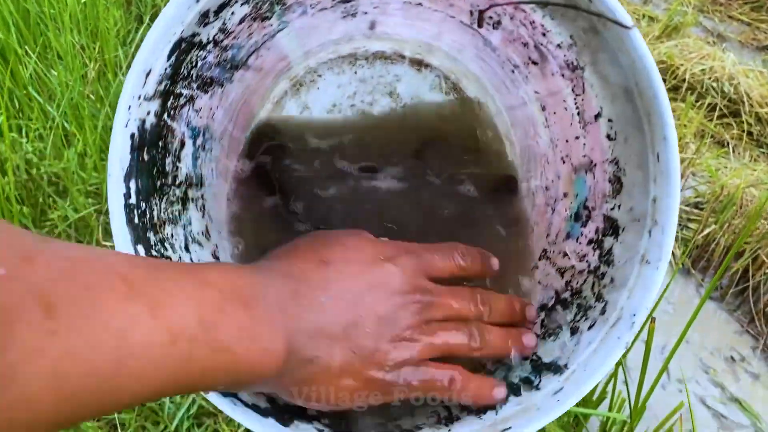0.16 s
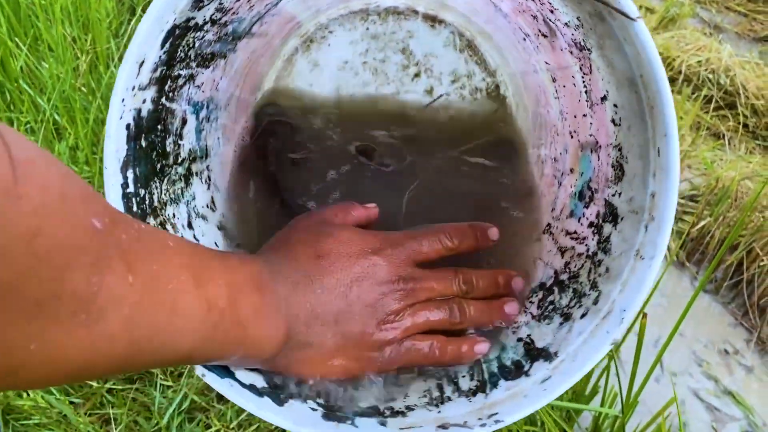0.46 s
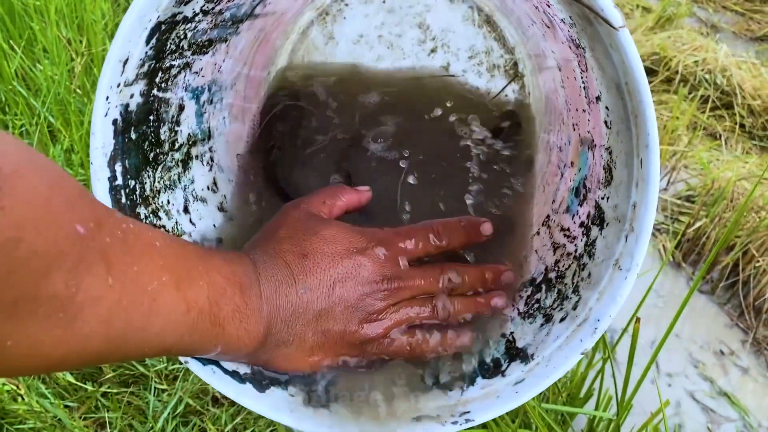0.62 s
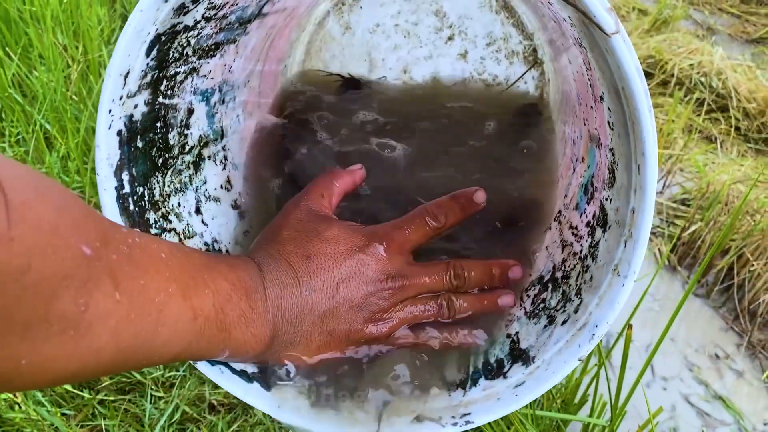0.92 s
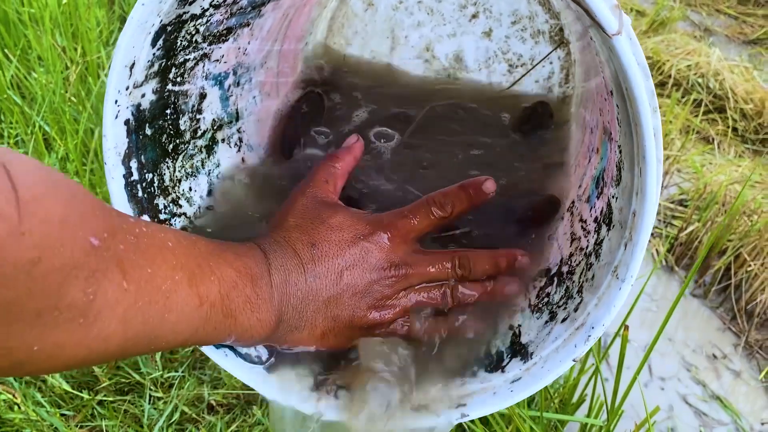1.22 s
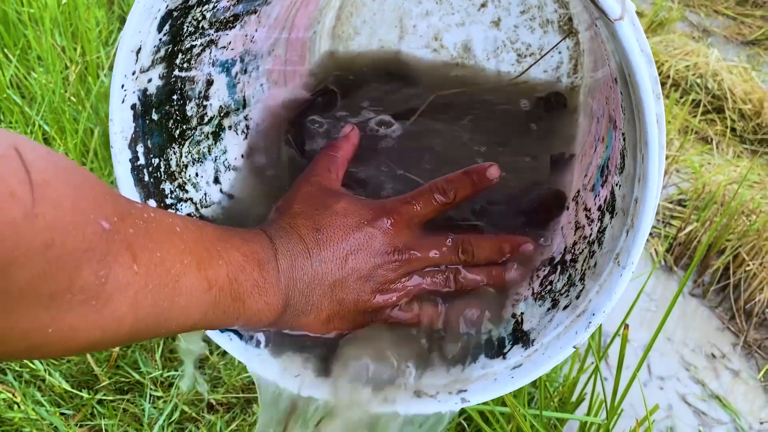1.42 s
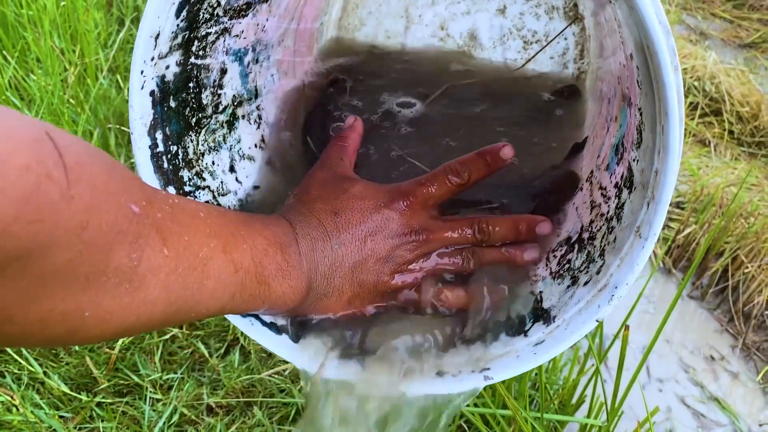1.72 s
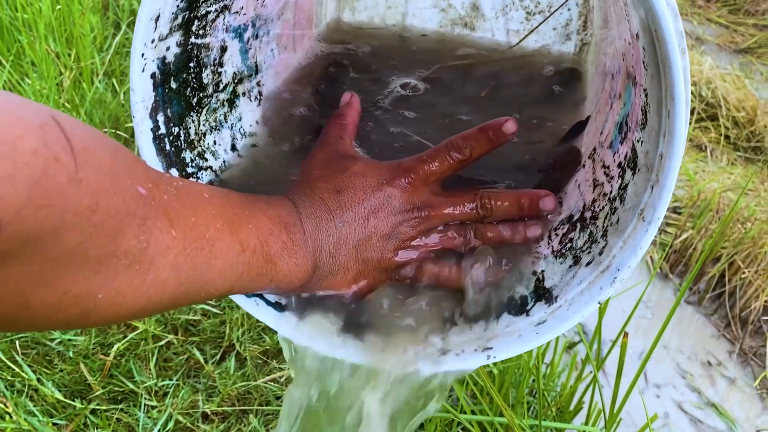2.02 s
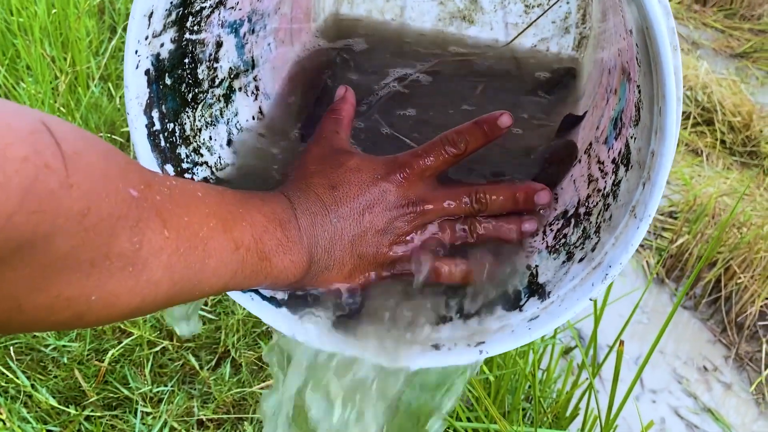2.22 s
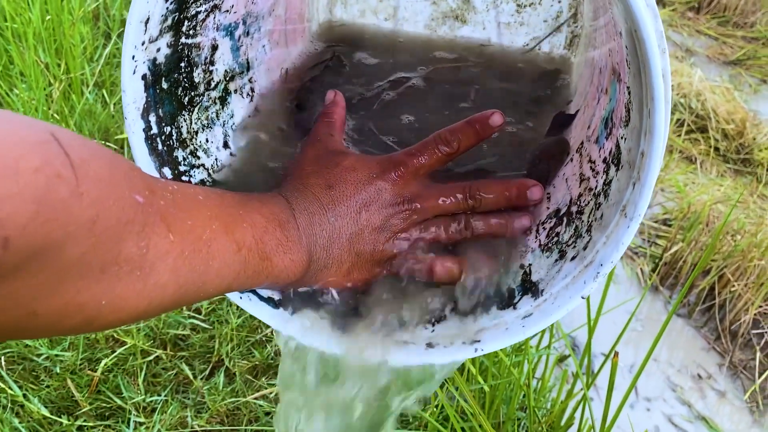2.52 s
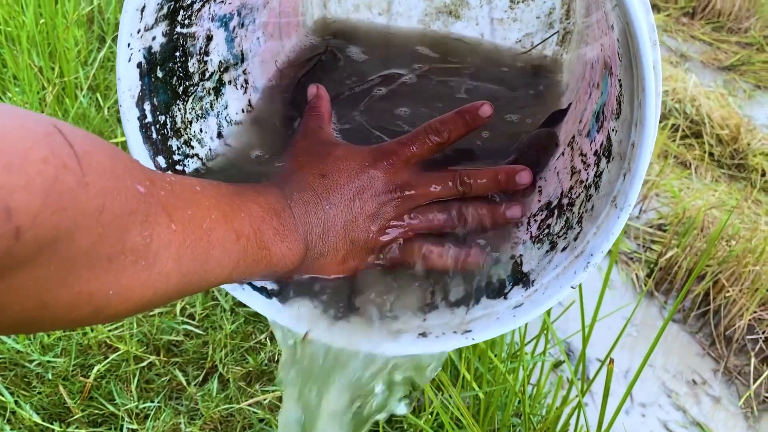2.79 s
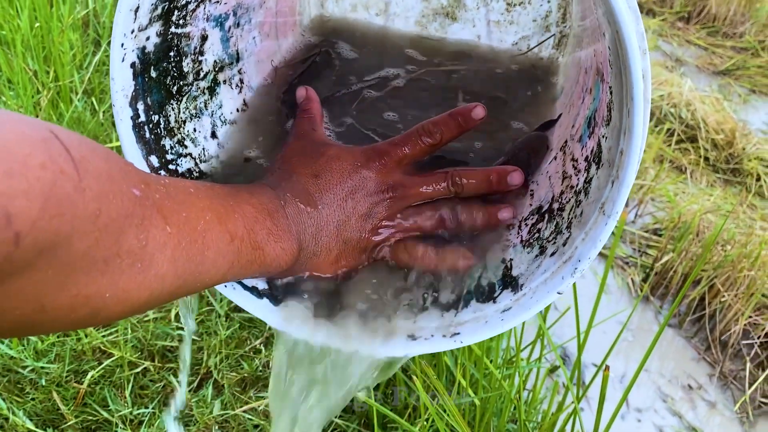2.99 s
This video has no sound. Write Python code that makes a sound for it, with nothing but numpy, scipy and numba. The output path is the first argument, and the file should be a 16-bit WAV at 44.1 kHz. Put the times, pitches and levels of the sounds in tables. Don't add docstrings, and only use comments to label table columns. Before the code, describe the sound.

Water splashes and patters onto wet grass while shells knock dully inside a tilted plastic bucket

```python
import sys
import numpy as np
from scipy import signal
from scipy.fft import rfft, irfft
from scipy.io import wavfile
from scipy.ndimage import uniform_filter1d
from numba import njit

SR = 44100
rng = np.random.default_rng(int(sys.argv[2]) if len(sys.argv) > 2 else 0)


def to_wav(sig):
    pcm = np.clip(np.atleast_2d(sig), -1, 1) * 32767
    pcm = np.round(pcm).astype(np.int16)
    wavfile.write(sys.argv[1], SR, pcm.T)


def boost_factor(decibels):
    exponent = np.asarray(decibels, float) / 20
    return 10 ** exponent


N = 138915

TOP_HZ, CUT_HZ = 15900, 16400

# (time [s], stream level [dB], gurgle level [dB])
FLOW = [(0, -36.5, -47.5), (.32, -34, -48.5), (.4, -35.5, -51), (.47, -50, -53.5), (.55, -48, -47),
        (.6, -52.5, -58.5), (.71, -59.5, -56), (.795, -61, -62), (.86, -55, -42), (.93, -60.5, -53.5),
        (.955, -40, -54.5), (.99, -51, -55), (1.05, -39, -53.5), (1.18, -43.5, -49), (1.54, -36.5, -52.5),
        (1.95, -35, -52.5), (2.38, -36.5, -47.5), (3.15, -37.5, -47.5)]
# (frequency [Hz], density [dB per Hz])
STREAM_SPECTRUM = [(900, -43), (1500, -7.5), (2300, -6), (3200, -2), (4950, -1.5), (6100, -8), (10700, -5),
                   (16000, -13.5)]
PATTER_EDGES_HZ = (0, 2700, 6000, 10000, TOP_HZ)
DROPS_PER_S, DROP_CYCLES, DROP_SCATTER_DB = 4000, 4.5, 5
HISS_DB, PATTER_DB, STREAM_DB = -1, 1.1, -0.5

BUBBLES_PER_S, BUBBLE_LOW_HZ, BUBBLE_OCTAVES = 1100, 580, 1.05
BUBBLE_CYCLES, BUBBLE_GLIDE, BUBBLE_DB = 14.7, 0.31, 2.5

# (time [s], level [dB])
WIND = [(0, -39.5), (.24, -37.5), (.3, -42.5), (.69, -37.5), (.76, -36), (.82, -39.5), (.88, -31),
        (.94, -45), (1.1, -46), (1.17, -37), (1.3, -43.5), (2.3, -43.5), (2.56, -42), (2.68, -38.5),
        (3.15, -44.5)]
WIND_HZ, WIND_WIDTH_HZ = 62, 35.2
BUFFET_HZ, BUFFET_DB, BUFFET_FLICKER_DB = 115, -4.5, 4.5
SLOSH_DB, SLOSH_FLICKER_DB = -58.5, 2

# (time [s], peak level [dB], ring frequency [Hz], drum-note level [dB])
KNOCKS = [(0.051, -24.5, 573, -24), (0.11, -20.5, 704, -36), (0.207, -17.5, 550, -28.5),
          (0.36, -24.5, 590, -31.5), (0.432, -18, 980, -33), (0.484, -23.5, 613, -36),
          (0.528, -22.5, 610, -35.5), (0.574, -24, 626, -30), (0.607, -33.5, 704, -31),
          (0.645, -35.5, 990, -28), (0.671, -27.5, 500, -50), (0.811, -35, 910, -56),
          (0.824, -27, 900, -43), (0.974, -26, 542, -29), (1.049, -29, 590, -29), (1.093, -23, 650, -34),
          (1.145, -17.5, 605, -21), (1.187, -24, 616, -17.5), (1.285, -16, 648, -21.5),
          (1.323, -24.5, 577, -22), (1.378, -39, 495, -42), (1.431, -35, 520, -36),
          (1.464, -29.5, 690, -29.5), (1.582, -23.5, 494, -31), (1.621, -30, 886, -33),
          (2.66, -24.5, 900, -47), (2.695, -27, 1170, -45.5)]
# (frequency [Hz], level [dB], decay by 60 dB [s])
WALL_MODES = [(400, -11.5, 0.13), (614, -9, 0.21), (801, 3.5, 0.042), (968, 2.5, 0.041), (1353, -1, 0.051),
              (1550, 0.5, 0.029), (2195, -7.5, 0.024)]
DRUM_HZ, DRUM_T60_S, DRUM_RISE_S, DRUM_DB, DRUM_LATE_S = 240, 0.091, 0.0032, 5.5, 0.005
RING_T60_S, RING_DB, WALL_DB, CRACK_DB = 0.024, 3.5, -10.5, -15
REBOUND_S, REBOUND_DB = 0.007, -8

# (time [s], length [s], start frequency [Hz], end frequency [Hz], level [dB])
GLUGS = [(0.073, 0.061, 388.3, 285.5, -18.5), (0.103, 0.074, 280, 168, -23), (0.641, 0.017, 171, 270, -22),
         (.645, 0.025, 366, 378, -27), (0.668, 0.012, 407, 533, -23.5), (0.816, 0.025, 400, 427, -31),
         (0.844, 0.043, 115, 91.4, -30), (1.176, 0.034, 281, 248, -16.5), (1.587, 0.012, 236, 197, -22.5),
         (2.537, 0.024, 224, 198, -32), (2.544, 0.031, 80, 62, -25.5), (2.894, 0.11, 197, 267, -36.5),
         (3.126, 0.072, 198, 188, -28.5), (0.27, .026, 720, 900, -30), (.288, 0.02, 900, 1150, -32),
         (1.733, 0.039, 221, 220, -36), (2.14, 0.023, 226, 222, -36), (2.322, 0.015, 1110, 1160, -37.5),
         (0.991, 0.024, 258, 240, -30.5), (1.69, 0.032, 200, 190, -40), (2.008, 0.035, 216, 205, -38),
         (2.218, 0.033, 219, 199, -38), (2.707, 0.028, 198, 149, -35), (2.59, 0.035, 75, 60, -35.5)]
OVERTONE_DB = -17

# (time [s], peak level [dB],
# frequency [Hz])
PLOPS = [(.7287, -33, 1000), (.812, -33, 790), (.818, -32, 1160), (.831, -20, 820), (.88, -36, 910),
         (.095, -27, 650), (1.89, -33, 786), (2.262, -30, 820), (2.349, -34, 930), (2.397, -38, 770),
         (2.446, -33, 837), (2.489, -28, 540), (2.773, -28, 640), (2.571, -33.5, 794), (2.65, -31, 620),
         (2.832, -31, 696), (2.87, -34, 520), (2.9, -31.5, 600), (2.958, -28.5, 1330), (3.041, -35.5, 750),
         (3.08, -33.5, 820)]
PLOP_CYCLES, PLOP_GLIDE, PLOP_DB = 21, 0.27, 3

# (time [s], peak level [dB],
# centre frequency [Hz], spray level [dB], spread [ms])
SPLATS = [(0.0997, -12, 2960, -34, 3), (.125, -12.5, 1900, -30, 2.5), (0.154, -13.5, 4700, -28, 1.5),
          (0.2287, -11, 4250, -25, 1.02), (.2683, -14.5, 4740, -14, 3), (0.372, -15.5, 2270, -14, 4.4),
          (0.4311, -4.5, 4220, -13, 1), (.446, -22, 2100, -22, 4), (1.09, -24, 1400, -40, 8),
          (1.286, -21, 2600, -20, 0.91), (1.3784, -27, 3180, -15, 2), (1.5278, -19, 2840, -3.5, 1.54),
          (1.593, -15, 4700, -12, 2.8), (2.0505, -13, 2870, -19, 2.7), (2.0766, -14, 3400, -16, 3),
          (2.144, -16, 3800, -15.5, 2.2), (2.1665, -8, 3600, -32, 0.4), (2.1954, -14.5, 3660, -8.5, 3.4),
          (2.229, -12, 4370, -20, 4.1), (2.2613, -15, 3000, -16, 3.7), (2.3126, -11, 2520, -35, 0.45),
          (2.343, -15, 4000, -15, 2.4), (2.348, -12, 3100, -17, 1.2), (2.372, -16, 4200, -12, 2.2),
          (2.394, -10, 4000, -10.5, 2), (2.447, -13, 3000, -13, 3.9), (2.5681, -13.5, 3290, -11, 3.5),
          (2.6287, -15, 3300, -23, 1.3), (2.6954, -21, 1880, -32, 3), (3.022, -15, 4900, -5, 1.2),
          (3.0798, -18.5, 3140, -10, 2),
          (0.4626, -23, 4570, -8, 2), (0.4976, -23, 11400, -25, 3), (0.521, -19, 6700, -22, 2),
         (0.5312, -21.5, 6700, -4.5, 2), (0.5433, -22.5, 4500, -4, 3), (0.5744, -29, 4670, -25, 2),
         (0.594, -23, 3350, -27, 2), (.663, -34.5, 4630, -8, 2), (0.7205, -21.5, 11200, -15.5, 2),
         (0.729, -20, 7050, -25, 1.5), (0.7397, -29, 6100, -13, 1.5), (.7405, -23, 2500, -25, 1.5),
         (.822, -32, 4530, -25, 8), (0.851, -31, 3550, -9, 12), (0.907, -31, 3500, -5, 2),
         (0.9477, -26, 4930, -14, 1.5), (.998, -31, 4200, -4, 3), (1.026, -32.5, 4000, -4, 4),
         (1.04, -25, 7840, -14, 3)]
SPLAT_OCTAVES, SPLAT_T60_S, SPRAY_TAIL_S = 0.27, 0.012, 0.0018
SPLAT_DB, SPRAY_DB = -4.5, 1.5


def unit(x):
    return x / np.sqrt(np.mean(x ** 2))


def curve(table, order):
    rows = np.array(table)
    return np.interp(np.arange(N) / SR, rows[:, 0], rows[:, order])


def band(x, hz, width_hz):
    return signal.lfilter(*signal.iirpeak(hz, hz / width_hz, fs=SR), x)


def walk(rate):
    hold = int(SR / rate)
    steps = np.repeat(rng.standard_normal(N // hold + 1), hold)
    smooth = uniform_filter1d(uniform_filter1d(steps, hold), hold)
    return unit(smooth[:N])


@njit
def ring(start, step, t60, rise, size, glide, count):
    out = np.zeros(count)
    for k in range(len(start)):
        fade, soft = np.exp(-np.log(1000.) / t60[k]), np.exp(-1 / rise[k])
        env, up, phase = size[k], 1., 0.
        for i in range(max(int(start[k]), 0), min(int(start[k] + t60[k]), count)):
            phase += step[k] * (1 + glide[k] * (i - start[k]) / t60[k])
            env, up = env * fade, up * soft
            out[i] += env * (1 - up) * np.sin(phase)
    return out


def grains(s, hz, t60_s, db, rise_s, glide):
    values = np.broadcast_arrays(s, hz, t60_s, db, rise_s, glide)
    s, hz, t60_s, db, rise_s, glide = (np.ascontiguousarray(v, float) for v in values)
    step = 2 * np.pi * np.minimum(hz, SR / 3) / SR
    return ring(s * SR, step, t60_s * SR, rise_s * SR, boost_factor(db), glide, N)


def bursts(s, db, t60_s, rise_s):
    clicks = np.zeros(N)
    clicks[(s * SR).astype(int)] = boost_factor(db)
    t = np.arange(SR // 10) / SR
    response = boost_factor(-60 * t / t60_s) * (1 - np.exp(-t / rise_s))
    return signal.fftconvolve(clicks, response)[:N]


def stream():
    when, pitch, chance = rng.random((int(DROPS_PER_S * N / SR), 3)).T
    hz = 1100 * 14 ** pitch
    db = np.minimum(-DROP_SCATTER_DB * np.log(chance), 16)
    drops = grains(when * N / SR, hz, DROP_CYCLES * 2 / hz, db, 0.0001, 0.28)
    spectrum, f = rfft(drops), np.fft.rfftfreq(N, 1 / SR) + 1
    flat = spectrum / np.sqrt(uniform_filter1d(np.abs(spectrum) ** 2, size=2000))
    hiss = rfft(rng.standard_normal(N)) / np.sqrt(N)
    shape_hz, shape_db = np.array(STREAM_SPECTRUM).T
    colour = boost_factor(np.interp(np.log(f), np.log(shape_hz), shape_db, left=-60))
    water = (flat + boost_factor(HISS_DB) * hiss) * colour
    patter = np.zeros(N)
    for low, high in zip(PATTER_EDGES_HZ, PATTER_EDGES_HZ[1:]):
        patter += irfft(water * (f >= low) * (f < high), N) * boost_factor(0.98 * walk(30.11))
    return unit(patter) * boost_factor(curve(FLOW, order=1) + STREAM_DB + PATTER_DB * walk(45.19))


def gurgle():
    when, pitch, chance = rng.random((int(BUBBLES_PER_S * N / SR), 3)).T
    hz = BUBBLE_LOW_HZ * 2 ** (BUBBLE_OCTAVES * pitch)
    db = np.minimum(-3.5 * np.log(chance), 15)
    pops = grains(when * N / SR, hz, BUBBLE_CYCLES / hz, db, 0.00029, BUBBLE_GLIDE)
    wash = band(rng.standard_normal(N), 850, 600)
    return (unit(pops) + boost_factor(-4.5) * unit(wash)) * boost_factor(curve(FLOW, order=2) + BUBBLE_DB)


def wind():
    noise = rng.standard_normal((2, N))
    rumble = unit(band(band(noise[0], WIND_HZ, WIND_WIDTH_HZ), WIND_HZ, WIND_WIDTH_HZ * 1.13))
    buffet = unit(band(band(noise[1], BUFFET_HZ, 113), BUFFET_HZ, 177))
    buffet = buffet * boost_factor(BUFFET_DB + BUFFET_FLICKER_DB * walk(12))
    return (rumble + buffet) * boost_factor(curve(WIND, order=1) - 1.5)


def slosh():
    drone = unit(band(band(rng.standard_normal(N), DRUM_HZ, 117), DRUM_HZ, 150))
    s, _, _, drum_db = np.array(KNOCKS).T
    stirring = boost_factor(SLOSH_DB) + bursts(s, drum_db - 11.5, 0.19, 0.0076)
    return drone * boost_factor(SLOSH_FLICKER_DB * walk(18)) * stirring


def knocks():
    s, db, hz, drum_db = np.array(KNOCKS).T
    rebound_late, rebound_db, drum_detune = rng.standard_normal((3, len(s)))
    again = s + REBOUND_S * 2 ** (rebound_late / 2)
    both = np.r_[s, again]
    both_db = np.r_[db, db + REBOUND_DB + 2 * rebound_db]
    out = grains(both, np.r_[hz, hz], RING_T60_S, both_db + RING_DB, 0.0013, 0.01)
    for mode_hz, mode_db, t60 in WALL_MODES:
        detune, share = rng.standard_normal((2, len(s)))
        level = db + WALL_DB + mode_db + 3 * share
        out += grains(s, mode_hz * (1 + detune / 40), t60, level, 0.00073, 0.)
    drum_hz = DRUM_HZ * (1 + 0.042 * drum_detune)
    out += grains(s + DRUM_LATE_S, drum_hz, DRUM_T60_S, drum_db + DRUM_DB, DRUM_RISE_S, -0.11)
    crack = unit(band(rng.standard_normal(N), 1460, 1170))
    return out + bursts(both, both_db + CRACK_DB, 0.027, 0.0001) * crack


def glugs():
    t, out = np.arange(N) / SR, np.zeros(N)
    wobble_db = 2.2 * walk(90)
    for s, length, hz, end_hz, db in GLUGS:
        u = np.clip((t - s) / length, 0, 1)
        phase = 2 * np.pi * length * (hz * u + (end_hz - hz) * u ** 2 / 2)
        tone = np.sin(phase) + boost_factor(OVERTONE_DB) * np.sin(2 * phase)
        out += boost_factor(db + wobble_db) * np.sin(np.pi * u ** 1.09) * tone
    return out


def plops():
    s, db, hz = np.array(PLOPS).T
    return grains(s, hz, PLOP_CYCLES / hz, db + PLOP_DB, 0.00085, PLOP_GLIDE)


def splats():
    s, db, hz, spray_db, spread_ms = np.array(SPLATS).T
    spread_s = spread_ms / 1000
    chance = np.clip(rng.standard_normal((10, 3, len(s))), -1.5, 1.5)
    chance[0] = [[0], [0], [2]]
    drop_s = s + spread_s * np.abs(chance[:, 0])
    drop_hz = hz * 2 ** (SPLAT_OCTAVES * chance[:, 1])
    drop_db = db + SPLAT_DB - 10.5 + 3 * chance[:, 2]
    drops = grains(drop_s.ravel(), drop_hz.ravel(), SPLAT_T60_S / 2, drop_db.ravel(), 0.00014, 0.22)
    spray = unit(band(band(rng.standard_normal(N), 6150, 10000), 14200, 22000))
    spray = signal.sosfilt(signal.ellip(8, 1, 50, TOP_HZ, fs=SR, output="sos"), spray)
    puffs = np.zeros(N)
    starts = (s * SR).astype(int)
    for start, level, width in zip(starts, db + spray_db + SPRAY_DB, spread_s + SPRAY_TAIL_S):
        u = np.arange(min(SR // 10, N - start)) / SR / width
        puffs[start:start + len(u)] += boost_factor(level) * u * np.exp(-u ** 2)
    return drops + puffs * spray


def scene():
    water = stream() + gurgle() + plops() + splats()
    bucket = slosh() + knocks() + glugs()
    return (water + wind() + bucket)[None]


def roll_off(x):
    return signal.sosfilt(signal.butter(12, 16820, fs=SR, output="sos"), x)


def record(dry):
    low_pass = signal.ellip(8, 1, 70, CUT_HZ, fs=SR, output="sos")
    mix = signal.sosfilt(low_pass, dry)
    return roll_off(mix)


dry = scene()
out = record(dry)
to_wav(out)
```